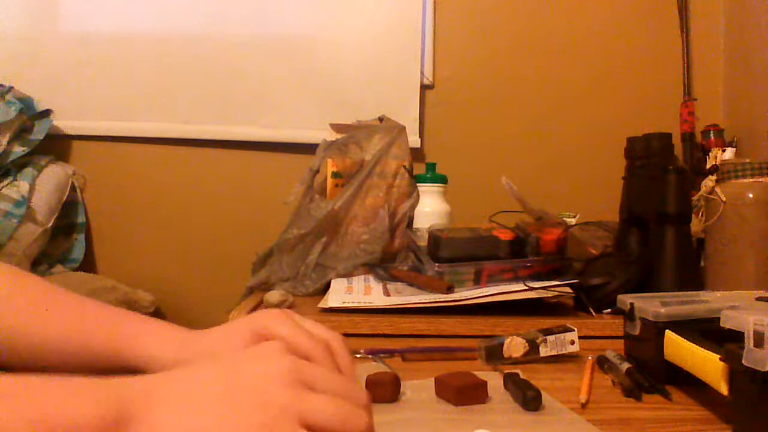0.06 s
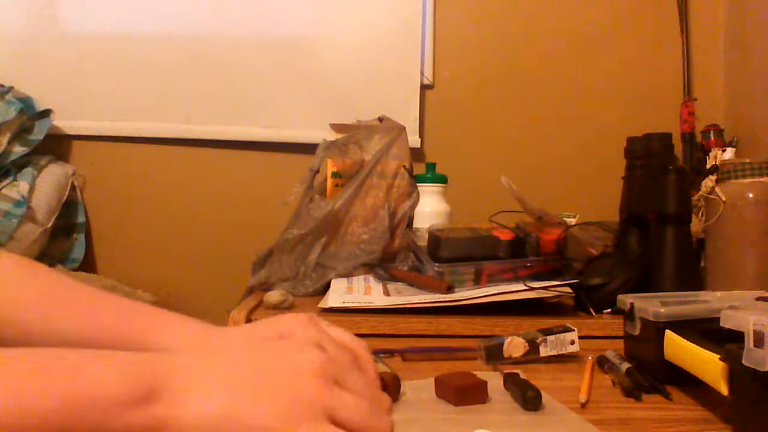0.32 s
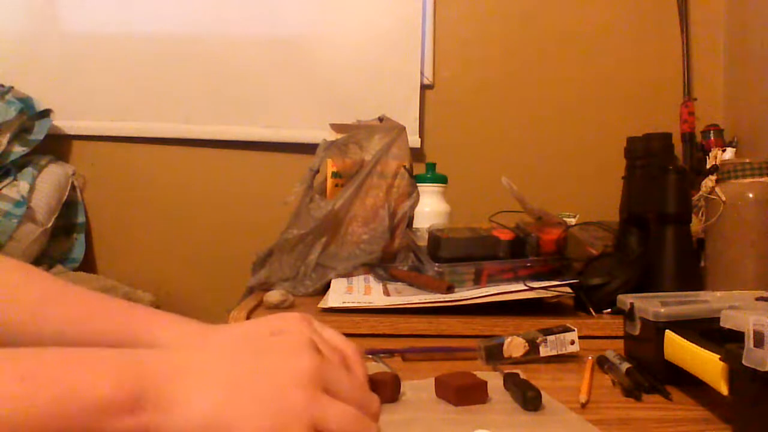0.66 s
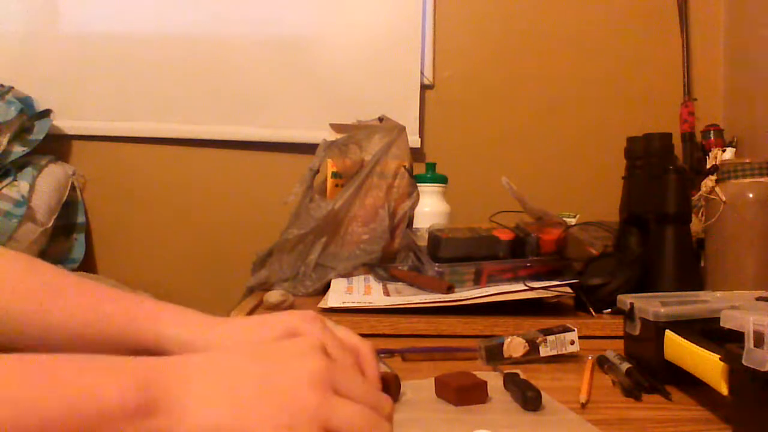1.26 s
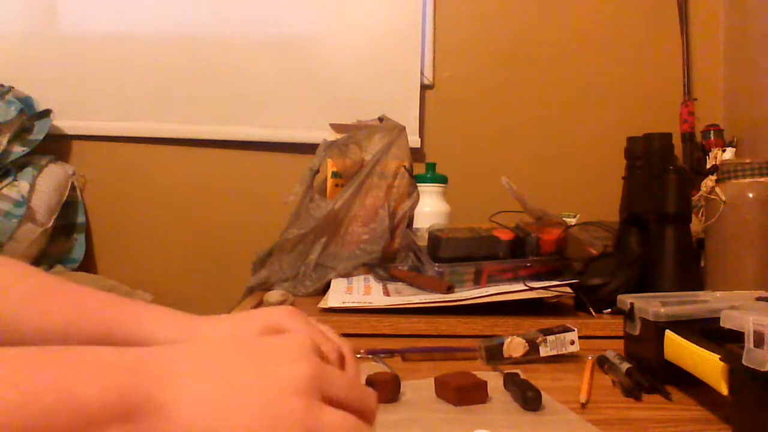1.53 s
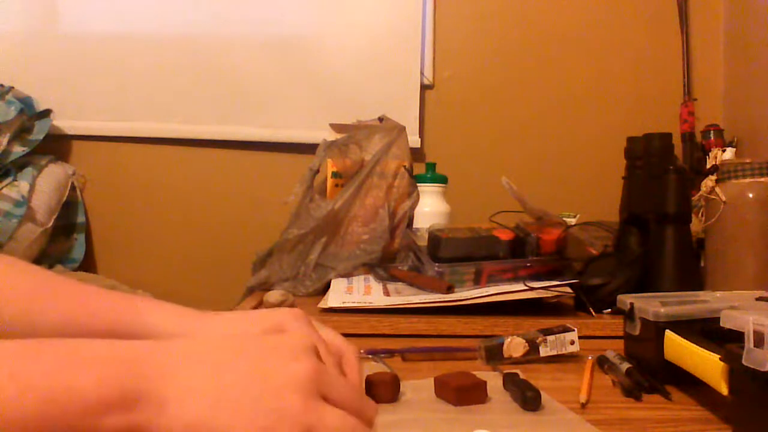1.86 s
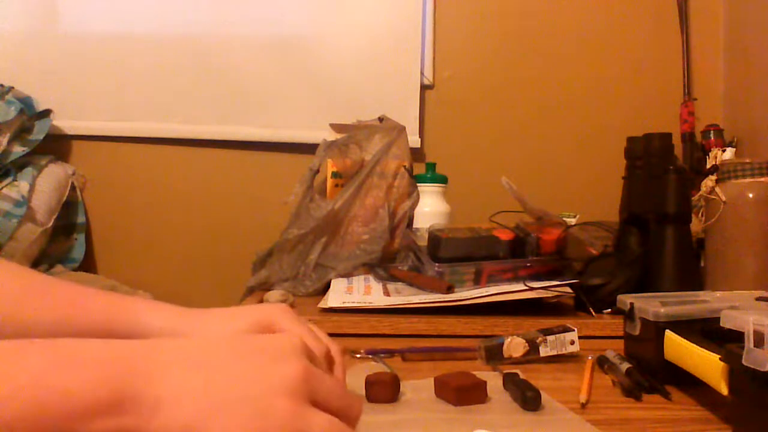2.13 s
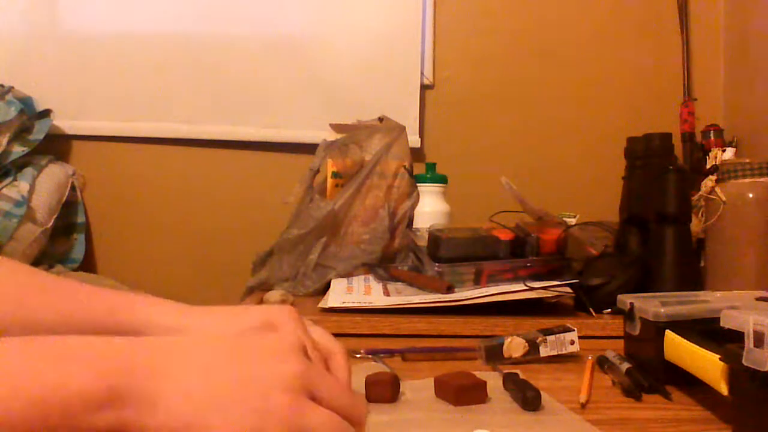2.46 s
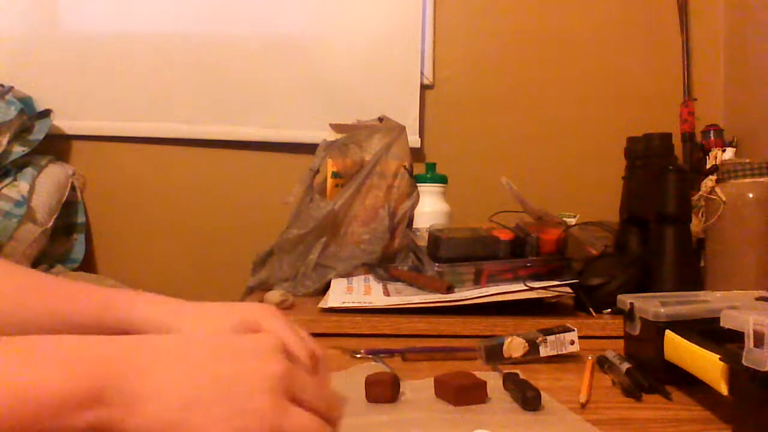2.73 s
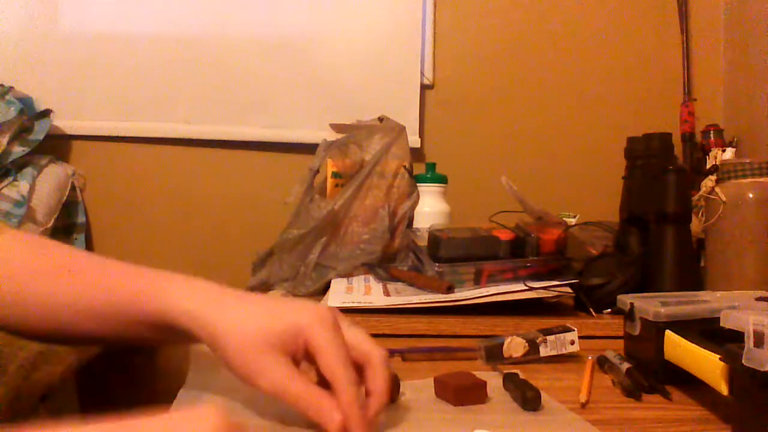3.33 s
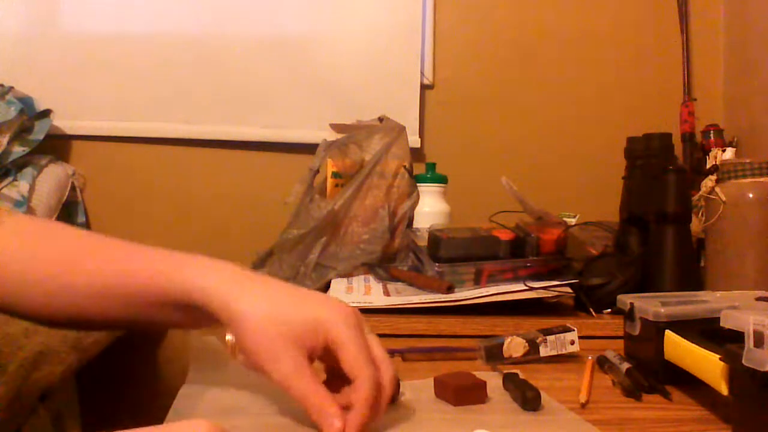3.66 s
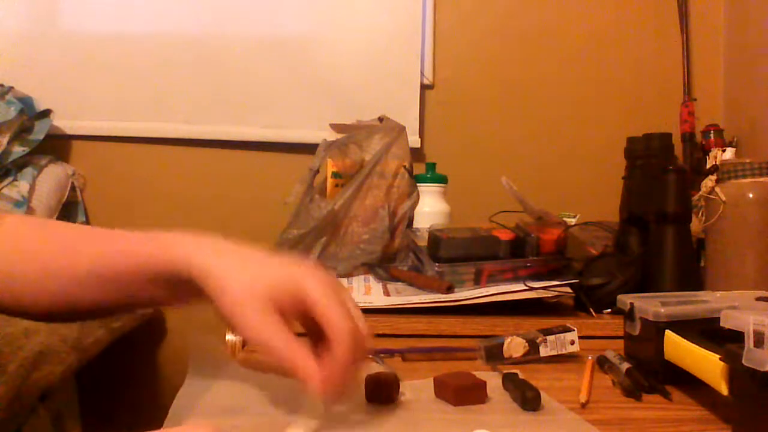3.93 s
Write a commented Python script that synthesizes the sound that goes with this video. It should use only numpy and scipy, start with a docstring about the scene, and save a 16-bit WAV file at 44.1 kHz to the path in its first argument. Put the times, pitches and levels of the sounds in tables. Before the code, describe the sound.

Soft knocks on a wooden desk as hands press clay, ending in a paper crinkle.

```python
"""A brief rub and a crackle of paper, then a wooden knock: hands press clay on a sheet on a desk,
close to a stereo microphone in a small, quiet room. The desk knocks under the changing weight,
loudest late on. Skin hisses as it slides over clay and sheet, and squeaks as it sticks and slips.
At the end the paper buckles and crinkles. Behind lie a low rumble, a faint hum and microphone hiss."""
import sys
import numpy as np
from scipy import signal
from scipy.fft import rfft, irfft
from scipy.io import wavfile
from scipy.ndimage import uniform_filter1d

SR = 44100
rng = np.random.default_rng(int(sys.argv[2]) if len(sys.argv) > 2 else 0)


def output_pcm(signal):
    """Save a mono or channel-first signal as 16-bit PCM at the path in sys.argv[1].

    Samples are clipped to [-1, 1] before scaling.
    """
    pcm = np.clip(np.atleast_2d(signal).T, -1, 1) * 32767
    wavfile.write(sys.argv[1], SR, np.round(pcm).astype(np.int16))


N = 176400
T = np.arange(N) / SR

# knocks of the desk (time [s], level [dB], contact cut-off [Hz]: low = soft, treble tick [dB],
# low thump [dB], room send [dB], hollow tone [Hz], hollow tone level [dB])
DESK_KNOCKS = [(0.1615, 1.5, 1970, -18.5, -7.5, 2, 479, -35.5), (.7578, -7.5, 750, -34, -10, -1, 562, -49),
               (.8425, -7.5, 890, -34, -10.5, 0, 405, -51.5),
               (.9485, -4.5, 2130, -11.5, -0.5, -1, 415, -49),
               (1.1479, -14.5, 900, -32, -15, 1.5, 415, -51.5), (1.2974, 1, 960, -17.5, -6.5, -2, 406, -39),
               (1.4954, -19, 800, -38, -22, 1, 490, -54), (1.7034, 5, 1494, -16, 1, -3, 566, -43),
               (1.9004, -1, 1100, -28, -6, -1.5, 581, -50), (1.9956, -14.5, 1000, -34, -15, 2, 419, -54),
               (2.213, 10, 1760, -14.5, 4, -2, 569, -44.5), (2.4713, -25, 1200, -31, -20, 2, 520, -61),
               (2.7764, -11, 600, -38, -10, 5, 293, -38), (3.2397, 14, 2190, -9, 1, -2.5, 430, -44),
               (3.2759, 11.5, 2100, -8, -6, -3, 410, -42), (3.3035, 5, 2000, -20, -8, -7, 414, -53),
               (3.3286, -3, 1800, -30, -13, -8, 414, -62)]
# colours of the desk top's swing and of its tick (frequency [Hz], gain [dB])
SWING_COLOUR = [(60, -13.5), (150, -13.5), (350, -7.5), (650, -5), (1100, -1.5), (1600, -1.5), (1950, -6.5),
                (2400, -21.5), (4000, -42), (9000, -47)]
TICK_COLOUR = [(500, -7), (1800, -37), (2500, -4.5), (3400, -0.5), (4600, -8), (7500, -8), (10000, -12),
               (16000, -25)]
# modes of the desk (frequency [Hz], relative level [dB], time to fall 60 dB [s])
DESK_MODES = [(125.8, -45.5, 0.2), (209.4, -52.5, 0.2), (267, -45.5, 0.12), (329.8, -47.5, 0.22),
              (420, -51, 0.17), (568.6, -50, 0.16), (790, -53.5, 0.18), (837, -47.5, 0.19),
              (1027, -65.5, 0.37), (1140, -55.5, 0.19), (1208, -53, 0.24), (1310, -49.5, 0.15),
              (1560, -61, 0.18), (1590, -57, 0.29)]
# modes follow the thump below this range, level plus room send above it (from [Hz], to [Hz])
THUMP_CROSSOVER = [336, 650]
# crinkles of the paper (time [s], level [dB], decay [s], crack against ring [dB])
PAPER_CRINKLES = [(0.066, -15.5, 0.011, 6.5), (0.9346, -20.5, 0.0024, 5.5), (1, -18, 0.0014, 3),
                  (1.010, -19, .002, -12), (3.7253, -12, .0005, -4), (3.8080, -5, .0007, -6),
                  (3.8170, -6, .001, -6), (3.8672, -3.5, .0012, 3), (3.874, 0, 0.0017, -2.5),
                  (3.882, -4, 0.0072, 3.5), (3.9144, -2.5, 0.0019, 1.5), (3.9225, -1, 0.009, -2.5),
                  (3.9385, -7, 0.007, 8), (3.954, -1, 0.001, 0), (3.9584, 0, .003, 0),
                  (3.969, -4, 0.012, 3)]
# colours of the paper's crack and of its ring (frequency [Hz], gain [dB])
CRACK_COLOUR = [(200, -37), (900, -22.5), (2200, -18), (3100, -12), (3700, -11), (4400, -8.5),
                (7600, -13.5), (10500, -13), (15500, -16)]
RING_COLOUR = [(2000, -40), (4500, -10), (5450, -8.5), (6100, -10), (6800, -4), (7900, -2.5), (8700, -15),
               (9600, -7.5), (11000, -29)]
# rubs on clay and sheet (peak time [s], rise before the lower limit [s], hiss [dB], low scuff [dB])
SKIN_RUBS = [(.01, 0.021, -58, -49.5), (0.073, 0.013, -53, -54.5), (.225, 0.013, -90, -61.5),
             (0.999, 0.061, -56.5, -64), (1.31, 0.049, -61.5, -69), (1.62, 0.06, -62.5, -74),
             (1.81, 0.031, -59.5, -72), (1.99, 0.028, -65, -82), (2.33, 0.021, -59, -64),
             (2.63, 0.022, -63, -62.5), (2.72, 0.032, -56.5, -65.5), (2.766, 0.022, -55.5, -55),
             (2.845, 0.04, -61, -72), (2.92, 0.02, -62, -73), (3.192, 0.036, -57, -71),
             (3.335, 0.064, -58, -54), (3.745, 0.053, -63.5, -84), (3.975, 0.063, -61, -56)]
# squeaks on the clay (peak time [s], half-width [s], pitch [Hz], level [dB], glide [octaves/s])
SKIN_SQUEAKS = [(0.066, 0.011, 1450, -53, -5), (0.09, 0.031, 4900, -59.5, 0), (1.23, .03, 1540, -64.5, -1),
                (1.536, 0.012, 1330, -54.5, 0.5), (3.204, 0.044, 1660, -59.5, -6)]
# thin swishes over the paper (peak time [s], half-width [s], level [dB])
SKIN_SWISHES = [(2.72, 0.033, -66), (3.526, 0.017, -56.5), (3.758, 0.03, -59.5)]
# colours of sliding skin (frequency [Hz], relative level [dB])
HISS_COLOUR = [(1000, -12), (2500, -4.5), (5000, -9), (7400, -1), (10000, -8), (15000, -15.5)]
SCUFF_COLOUR = [(100, 0.5), (290, 2), (700, -5), (1200, 3), (1700, -5.5), (2400, -21), (6000, -23)]
SWISH_COLOUR = [(3000, -33), (6200, -10), (7400, -2.5), (8400, -9), (14000, -22)]
# reverberation of the room (frequency [Hz], time to fall 60 dB [s])
ROOM_DECAY = [(120, 0.63), (400, 0.3556), (1300, 0.19), (3000, 0.48), (8000, 0.5), (16000, 0.03)]
# stereo width of the room and of the noise floor (frequency [Hz], side against mid [dB])
ROOM_WIDTH = [(100, -15), (400, -4.5), (1200, -4.5), (2500, 1), (6000, -0.5)]
FLOOR_WIDTH = [(25, -3.5), (120, -1.5), (400, -2.5), (1200, 0), (3000, 0), (12000, -1)]
# noise floor, from rumble to hiss (frequency [Hz], relative level [dB])
FLOOR_COLOUR = [(8.8, -3), (15, 6), (29, -9.5), (44, -7.5), (126, -20), (154, -21.5), (189, -20),
                (206, -24), (239, -22.5), (268, -21), (348, -25.5), (453, -26.5), (787, -30.5),
                (937, -29.5), (1250, -31), (1730, -30.5), (1940, -33.5), (2450, -34.5), (2920, -34.5),
                (6220, -35), (8090, -37.5), (12200, -32.5), (15800, -39)]
# each microphone's own colour of hiss (frequency [Hz], gain [dB])
LEFT_MIC_COLOUR = [(3500, 0), (4900, 2), (5700, 3), (7200, 8), (8700, -3), (9800, 7), (11300, -7),
                   (13000, 1.5), (15500, -5)]
RIGHT_MIC_COLOUR = [(3500, 0), (4700, 1.5), (5350, -7.5), (6200, 5.5), (7300, -15), (8400, 5.5), (9700, 7),
                    (10700, 0.5), (11700, 7), (12200, 4.5), (12650, 8), (13100, -0.5), (13700, 7),
                    (14400, 3)]
# electrical hum (frequency [Hz], rms level [dB])
HUM_TONES = [(120.5, -73.5), (240, -76.5), (360, -81.5), (1200, -92)]


def desk_knocks(grit_decay_s=.00058, tick_tail_s=.023, hollow_rise_s=.0017, hollow_t60_s=.09):
    """The desk top swings once, ticks and rings; its hollow tone depends on where the hands bear down."""
    out, t = np.zeros((2, N)), T[:SR // 2]
    swing, click = pulse(SWING_COLOUR), pulse(TICK_COLOUR)
    tick_t = t[:len(click)]
    for start, db, contact_hz, tick_db, thump_db, room_db, hollow_hz, hollow_db in DESK_KNOCKS:
        softness = signal.butter(3, contact_hz, fs=SR, output="sos")
        grit = rng.standard_normal(len(click)) * np.exp(-tick_t / grit_decay_s)
        grit_phase = np.exp(1j * np.angle(rfft(grit)))  # roughens the click and keeps its colour
        tick = irfft(rfft(click) * grit_phase) * np.exp(-tick_t / tick_tail_s)
        blow = amp(db) * signal.sosfilt(softness, swing) + amp(tick_db) * tick
        response = amp(room_db) * room()
        response[:, 0] += 1  # the direct path to the microphone
        add(out, start, through(blow, response))
        ring = 0
        for k, (hz, mode_db, t60) in enumerate(DESK_MODES):
            drive_db = np.interp(hz, THUMP_CROSSOVER, [thump_db, db + room_db])
            detuned_hz = hz * (1 + .0043 * rng.standard_normal())
            mode = (-1) ** k * np.sin(2 * np.pi * detuned_hz * t) * decay(t, t60)
            ring += amp(mode_db + drive_db) * mode
        hollow_envelope = (1 - np.exp(-t / hollow_rise_s)) * decay(t, hollow_t60_s)
        hollow = amp(hollow_db) * np.sin(2 * np.pi * hollow_hz * t) * hollow_envelope
        add(out, start, (signal.sosfilt(softness, ring) + hollow)[None])
    return out


def paper_crinkles(creases_per_s=4800, snap_s=.0027, room_db=-4.5, leftward_db=1.5):
    """The paper buckles in short runs of tiny snaps, which reach each microphone a little differently."""
    out, t = np.zeros((2, N)), T[:SR // 20]
    crack, ring = pulse(CRACK_COLOUR), pulse(RING_COLOUR)
    for start, db, decay_s, crack_db in PAPER_CRINKLES:
        creases = (rng.random(len(t)) < creases_per_s / SR) * np.exp(-t / decay_s)
        creases[0] = 1
        envelope = np.sqrt(np.convolve(creases ** 2, np.exp(-2 * t / snap_s))[:len(t)])
        snaps = rng.standard_normal((2, len(t))) * envelope / np.linalg.norm(envelope)
        direct = through(amp(db) * (ring + amp(crack_db) * crack), snaps)
        add(out, start, direct)
        add(out, start, amp(room_db) * through(direct[0], room()))
    return out * amp([[leftward_db / 2], [-leftward_db / 2]])


def skin_rubs(shortest_rise_s=.015, fall_ratio=1.15, roughness_db=3):
    """Skin slides over clay and sheet: a grainy hiss and a low scuff swell and fade together."""
    hiss_gain, scuff_gain = 0, 0
    for peak, rise, hiss_db, scuff_db in SKIN_RUBS:
        rise = max(rise, shortest_rise_s)
        fall = fall_ratio * rise
        swell = np.exp(-np.where(T < peak, ((T - peak) / rise) ** 2, (T - peak) / fall))
        hiss_gain += amp(hiss_db) * swell
        scuff_gain += amp(scuff_db) * swell
    grain = noise([(30, -1), (200, -12.5), (600, 7), (2000, -80)])
    hiss = hiss_gain * wide_noise(HISS_COLOUR, ROOM_WIDTH)
    scuff = scuff_gain * wide_noise(SCUFF_COLOUR, ROOM_WIDTH)
    return amp(roughness_db * grain) * (hiss + scuff)


def skin_squeaks(waver=.06, room_db=1):
    """Skin sticks and slips on the clay: brief, rough tones that glide a little and ring in the room."""
    drift = 1 + waver * noise([(50, 6.5), (300, -3), (1000, -54)])
    direct = 0
    for peak, half_width, hz, db, glide in SKIN_SQUEAKS:
        pitch = hz * 2 ** (glide * np.clip(T - peak, -.1, .1)) * drift
        direct += amp(db) * bump(peak, half_width) * np.sin(2 * np.pi * np.cumsum(pitch) / SR)
    return direct + amp(room_db) * through(direct, room())[:, :N]


def skin_swishes(knead_db=-67.5, swing_db=3.5):
    """Skin never quite rests on the paper: a faint, wandering friction with a few stronger strokes."""
    wander = np.tanh(noise([(1, 1), (7, -5), (25, -23), (200, -120)]))
    effort = amp(knead_db + swing_db * wander)
    for peak, half_width, db in SKIN_SWISHES:
        effort += amp(db) * bump(peak, half_width)
    return effort * wide_noise(SWISH_COLOUR, ROOM_WIDTH)


def room(tail_db=-3.5, early_db=-2.5, early_decay_s=.011, first_echo_s=.002):
    """The room at the microphone: close reflections off the desk's clutter, a tail that dies by octave."""
    t = T[:SR // 2]
    octave = np.log2(np.fft.rfftfreq(len(t), 1 / SR) + 1)
    centres_hz = 62.5 * 2. ** np.arange(9)
    hz, t60 = np.array(ROOM_DECAY).T
    band_t60s = np.interp(np.log(centres_hz), np.log(hz), t60)
    mid_side = []
    for _ in range(2):
        spectrum, tail = rfft(rng.standard_normal(len(t))), 0
        for band_t60, share in zip(band_t60s, np.eye(len(centres_hz))):
            band = irfft(spectrum * np.interp(octave, np.log2(centres_hz), share), len(t))
            tail += band * decay(t, band_t60)
        early = rng.standard_normal(len(t)) * np.exp(-t / early_decay_s)
        echoes = amp(tail_db) * flatten(tail) + amp(early_db) * flatten(early)
        mid_side.append(np.interp(t - first_echo_s, t, echoes, left=0))
    return stereo(*mid_side, ROOM_WIDTH)


def room_tone(floor_db=-53.5):
    """The room's rumble, the hiss of each microphone and a faint electrical hum."""
    hum = sum(np.sqrt(2) * amp(db) * np.sin(2 * np.pi * (hz * T + rng.random())) for hz, db in HUM_TONES)
    floor = wide_noise(FLOOR_COLOUR, FLOOR_WIDTH)
    mic_gains = amp([curve(LEFT_MIC_COLOUR, N), curve(RIGHT_MIC_COLOUR, N)])
    return amp(floor_db) * irfft(rfft(floor) * mic_gains, N) + hum


def amp(db):
    """Decibels to gain."""
    return 10 ** (np.asarray(db) / 20)


def decay(t, t60):
    """A fall of 60 dB every t60 seconds."""
    return np.exp(-np.log(1000) * t / t60)


def bump(peak_s, half_width_s):
    """A bell-shaped swell, down to 1/e a half-width from its peak."""
    return np.exp(-((T - peak_s) / half_width_s) ** 2)


def curve(points, size):
    """Read (Hz, value) points at the bins of a spectrum."""
    hz, value = np.array(points, float).T
    return np.interp(np.log(np.fft.rfftfreq(size, 1 / SR) + 1), np.log(hz), value)


def noise(colour):
    """Noise of a given colour, rms 1."""
    x = irfft(rfft(rng.standard_normal(N)) * amp(curve(colour, N)), N)
    return x / x.std()


def stereo(mid, side, width):
    """Left and right from mid and side, with a width that depends on frequency."""
    side = irfft(rfft(side) * amp(curve(width, len(side))), len(side))
    return np.array([mid + side, mid - side])


def wide_noise(colour, width):
    """Stereo noise from an independent mid and side."""
    return stereo(noise(colour), noise(colour), width)


def pulse(colour, size=2048):
    """The shortest causal click of a given colour."""
    cepstrum = irfft(np.log(amp(curve(colour, size))))
    cepstrum[1:size // 2] *= 2
    cepstrum[size // 2 + 1:] = 0
    return irfft(np.exp(rfft(cepstrum)))


def flatten(response, bins=130):
    """Even out the broad colour of a response and keep its fine resonances; energy 1."""
    spectrum = rfft(response)
    broad_colour = np.sqrt(uniform_filter1d(abs(spectrum) ** 2, bins))
    flat = irfft(spectrum / broad_colour, len(response))
    return flat / np.linalg.norm(flat)


def add(out, start_s, x):
    """Mix a sound in at its start time."""
    i = max(int(start_s * SR), 0)
    out[:, i:i + x.shape[1]] += x[:, :N - i]


def through(x, response):
    """Play a sound through a stereo response."""
    return signal.fftconvolve(x[None], response, axes=1)


def scene():
    """Desk, paper and hands over the room tone, as they reach the microphone."""
    return room_tone() + desk_knocks() + paper_crinkles() + skin_rubs() + skin_squeaks() + skin_swishes()


def record(dry):
    """The recorder cuts the treble steeply above 15.9 kHz."""
    return signal.sosfilt(signal.ellip(10, .2, 70, 15900, fs=SR, output="sos"), dry)


dry = scene()
out = record(dry)
output_pcm(out)
```